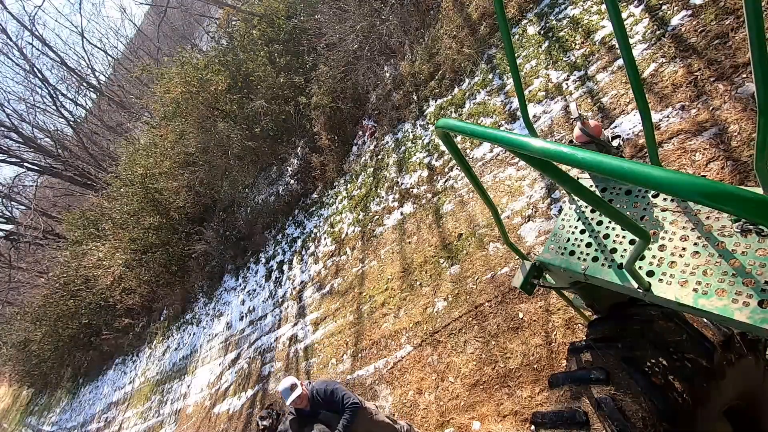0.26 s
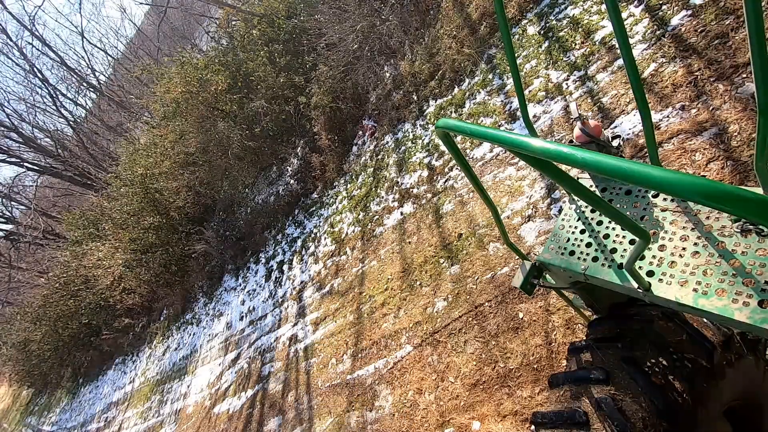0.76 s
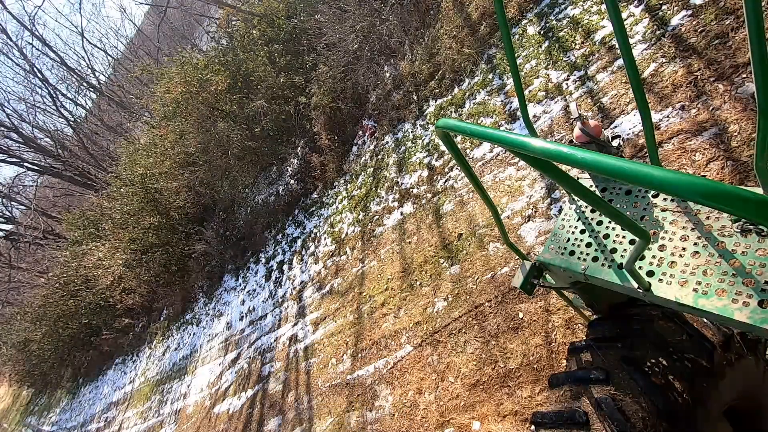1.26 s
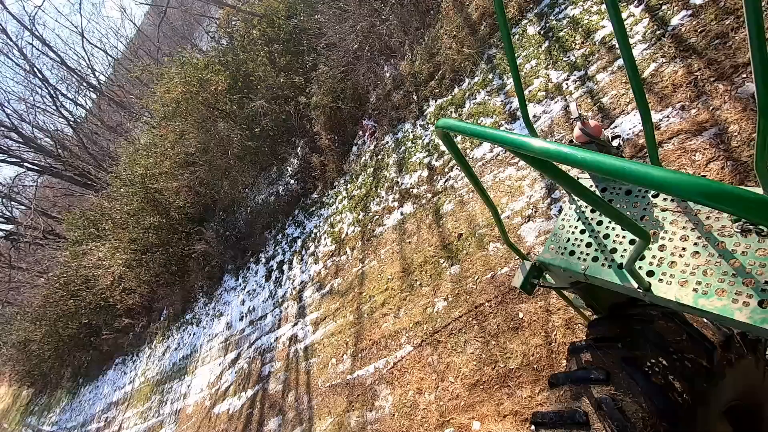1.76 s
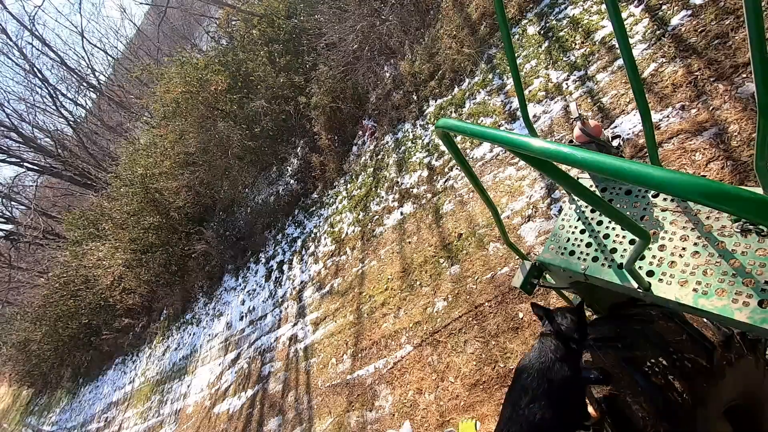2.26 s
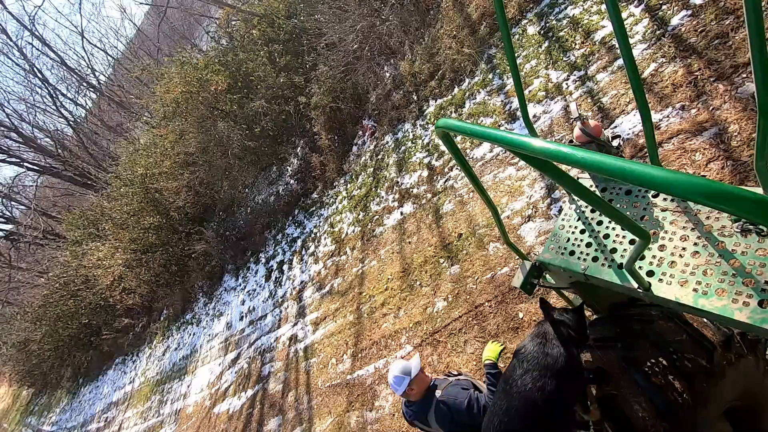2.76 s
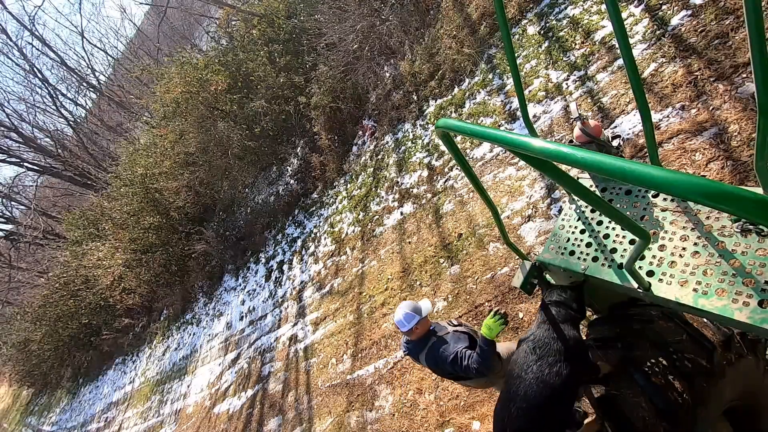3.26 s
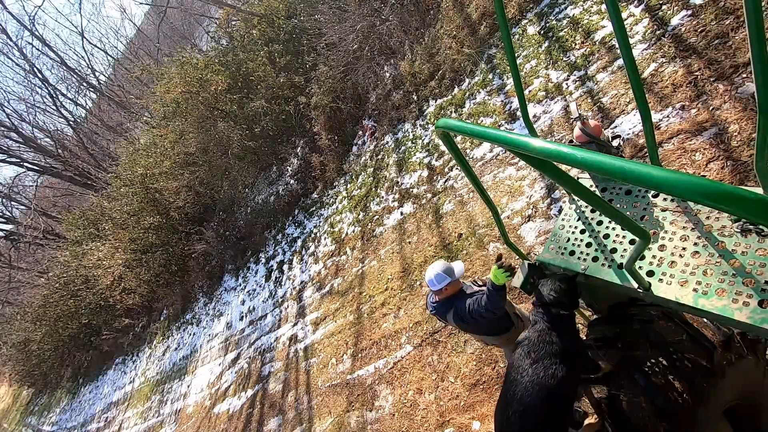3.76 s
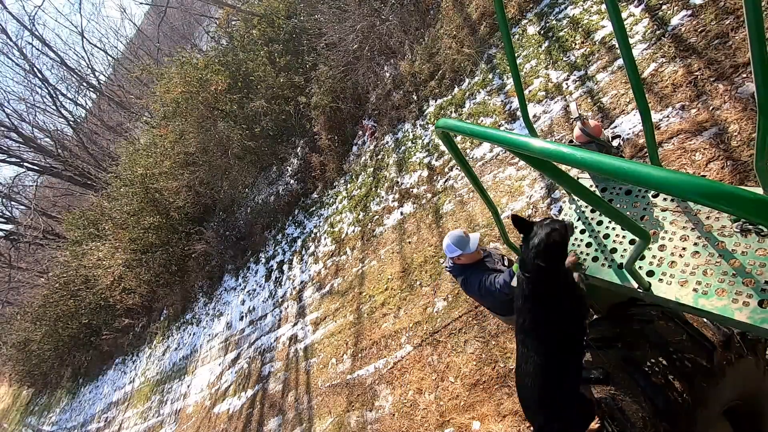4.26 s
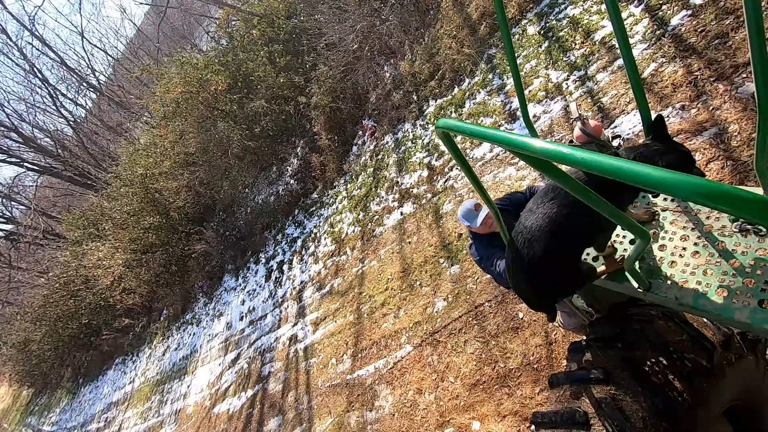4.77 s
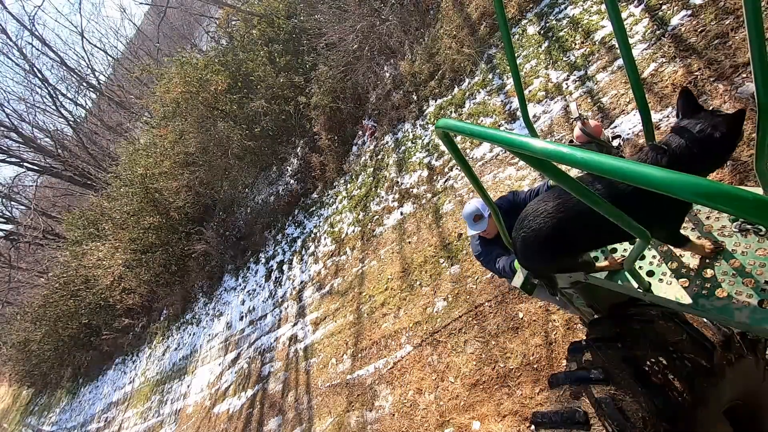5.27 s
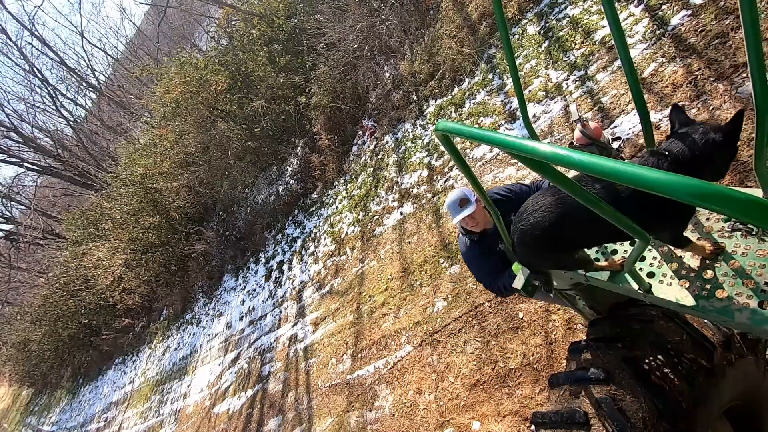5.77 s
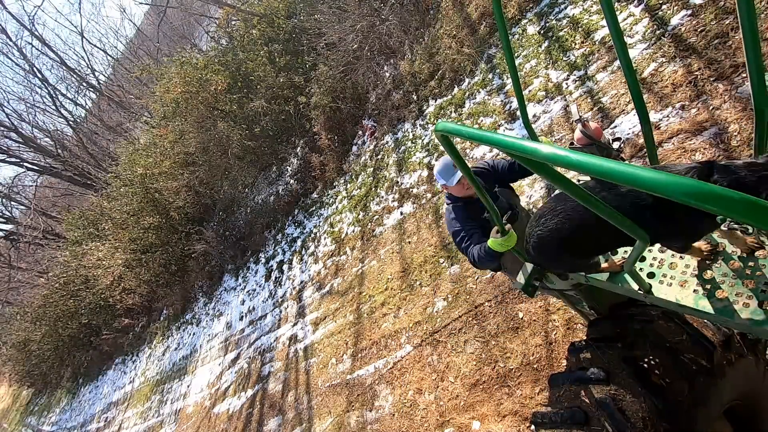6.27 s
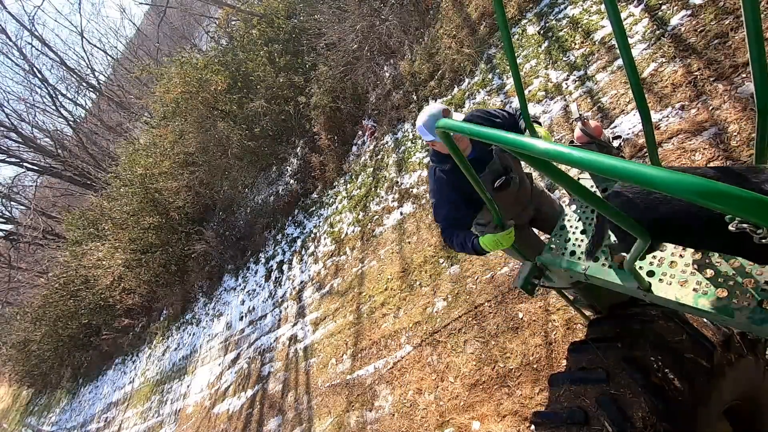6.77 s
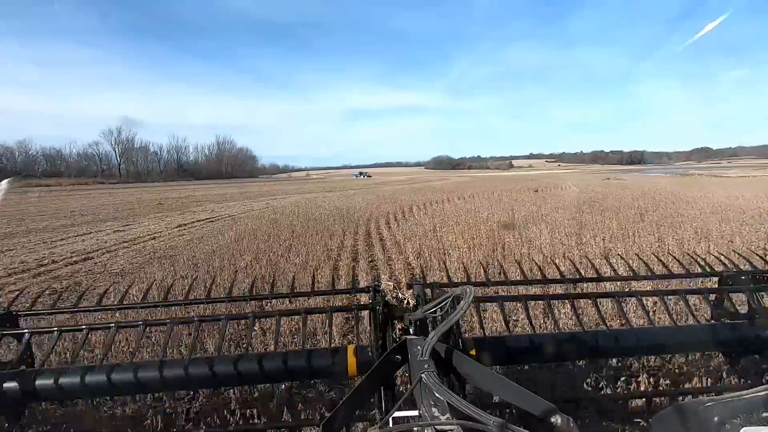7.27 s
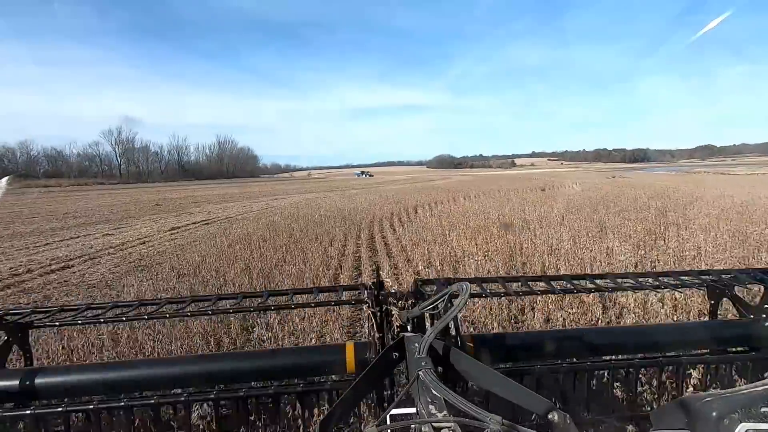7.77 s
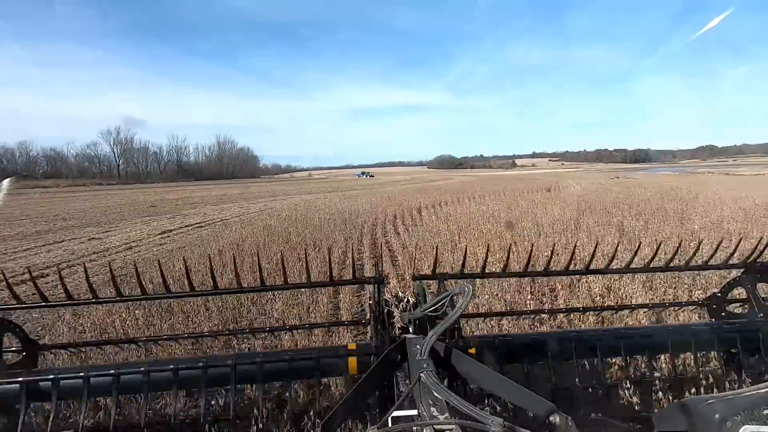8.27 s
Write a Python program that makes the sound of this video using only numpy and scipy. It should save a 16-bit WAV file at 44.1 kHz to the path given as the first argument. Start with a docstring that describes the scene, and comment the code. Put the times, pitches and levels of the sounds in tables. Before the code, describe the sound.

A microphone fixed on the harvester hears its steady idle for most of the time, with knocking, rushing air and a thin whistle. Faint gritty ticks on metal treads and a tiny shrill squeak appear late. Without any fade, the sound jumps to the enclosed cab at full working speed, bass-heavy and loud, pulsing about three times a second, with whining drives, a growing rumble and rustling, clattering crop cutting.

```python
"""A combine harvester's diesel idles, heard from the platform: hum, repeating knock, airy rush and a thin whistle.
Over it a dog is lifted up the steel ladder: noise bursts make the scuffs, and stacked tones one short squeak.
Then, abruptly, the machine is heard from inside the cab, cutting a dry crop at full speed:
throbbing tones boom, gear tones whine and sag with the shaft speed, and shaped noise makes the roar,
the header's clatter and the crackling stalks."""
import sys
import numpy as np
from scipy import signal
from scipy.fft import rfft, irfft, next_fast_len
from scipy.io import wavfile
from scipy.ndimage import uniform_filter1d, map_coordinates

SR = 44100
rng = np.random.default_rng(int(sys.argv[2]) if len(sys.argv) > 2 else 0)


def unload_wav(signal):
    """Save mono or channel-first audio to the path in sys.argv[1] as 16-bit WAV at rate SR, clipped to [-1, 1]."""
    wavfile.write(
        sys.argv[1],
        SR,
        np.round(np.clip(np.atleast_2d(signal).T, -1, 1) * 32767).astype(np.int16),
    )


N = 375291
T = np.arange(N) / SR  # time of every sample, s

# Scuffs of paws and boots on the ladder:
# (start [s], level before the stroke's shape [dB], rise [s], decay [s], low cut [Hz])
SCUFFS = [(4.455, -52, .01, .03, 2300), (4.914, -47, .016, .017, 5500), (4.993, -42, .008, .013, 2000),
          (5.659, -47, .004, 0.011, 5500), (6.394, -57, .004, .006, 5500), (6.447, -40, .004, .006, 5800),
          (6.492, -33.8, .0007, 0.007, 5200), (6.526, -50, .003, .02, 6000), (6.544, -42, .003, .007, 5000)]
# Coat and fur rubbing along the rails: (peak time [s], peak level [dB], rise [dB/s], fall [dB/s])
RUBS = [(5.15, -64.5, 28, 10), (6.5, -60, 65, 36)]
# What the steel treads ring with: (frequency [Hz], width [Hz], relative level [dB])
TREAD_RINGS = [(3900, 2400, 13.5), (6200, 740, 11), (8800, 3000, -6), (11500, 1200, -7), (14000, 2000, -9)]
# Overtones of the squeak at full pressure: (multiple of its pitch [-], level against the lowest tone [dB])
SQUEAK_OVERTONES = [(2, -5), (3, -3), (4, 2), (5, -19), (6, -22)]

# Idle hum; 3 is half the firing rate, 6 the firing rate:
# (multiple of the four-stroke cycle rate [-], level [dB])
IDLE_ORDERS = [(3, -46.5), (5, -48), (6, -42.5), (7, -48.5), (8, -54), (9, -51), (10, -53.5), (12, -43),
               (13, -52), (15, -55.5), (22, -58), (45, -62.5), (144, -67), (192, -73), (200, -72.5),
               (216, -76), (236, -77), (246, -69), (278, -72.5), (340, -79)]
# Fan and belt-driven shafts at idle: (frequency [Hz], level [dB])
IDLE_SHAFTS = [(17.7, -66), (52.7, -58), (106.2, -43.2), (151.2, -55), (212.3, -59), (354.2, -57),
               (383.6, -57.5), (767.6, -60.5)]
# Spectrum of the exhaust and fan rush at idle: (frequency [Hz], relative level [dB])
RUSH_SPECTRUM = [(20, -24), (35, -10), (47, -9), (100, 1.5), (140, -7), (185, -7), (245, -14.5), (380, -13),
                 (490, -19), (620, -17), (750, -22), (1700, -31.5), (4000, -39.5), (5700, -42.5),
                 (7300, -43), (10000, -50), (15500, -59.5)]
# Spectrum of combustion knock and valve clatter through the block: (frequency [Hz], relative level [dB])
KNOCK_SPECTRUM = [(150, -32), (300, 0.5), (600, -1.5), (820, -5.5), (1080, 0), (1750, -10), (2000, -5),
                  (2750, -13), (3000, -30), (3800, -20.5), (6000, -23.5), (12000, -50)]
# Sheet metal round the platform: (frequency [Hz], width [Hz], level against the direct sound [dB])
PLATFORM_PANELS = [(223.7, 11, -4), (293, 34, -6), (422, 25, -7.5), (543.5, 24, -3), (658, 31, -0.5),
                   (960, 96, -3.5), (1217, 23, -5.5), (1500, 74, -4), (3385, 54, -3.5), (3830, 65, -9.5),
                   (6830, 220, -16), (10550, 300, -15)]

# Gear speed at work, sagging as the crop loads the drives: (time [s], tooth mesh rate [Hz])
MESH_SPEED = [(6.9, 481.8), (7.08, 481.0), (7.26, 479.4), (7.5, 485.5), (7.72, 481.0), (7.92, 477.2),
              (8.12, 468.2), (8.51, 457.3)]
# Gear whine away from any resonance: (multiple of the mesh rate [-], level [dB])
MESH_ORDERS = [(1, -38.5), (2, -53.5), (3, -59.5), (4, -57), (5, -51), (6, -59)]
# Housing resonances that the whines slide in and out of: (frequency [Hz], width [Hz], boost [dB])
HOUSING = [(958, 24, 11), (1424.5, 37, 18), (2100, 54, 11.5), (2330, 40, 4)]
# Threshing drum and shakers: (frequency [Hz], level against the boom [dB])
DRUM = [(24.8, -6.5), (41.8, -6.5), (50.8, 0)]
# Fans and shafts at working speed: (frequency [Hz], level [dB])
WORK_SHAFTS = [(9.8, -41), (195.2, -38.5), (208, -44), (225, -44.5), (377, -42), (429, -41), (499, -48),
               (2496, -58), (5965, -67)]
# Spectrum of the machinery roar inside the cab: (frequency [Hz], relative level [dB])
ROAR_SPECTRUM = [(12, -7), (28, 3), (60, 0.5), (85, -1), (170, -7), (260, -13), (350, -14), (470, -11.5),
                 (570, -16.5), (680, -15.5), (900, -20), (1650, -26), (3000, -34), (6000, -59.5)]
# Spectrum of sickle and auger clatter in the header's sheet metal: (frequency [Hz], relative level [dB])
CLATTER_SPECTRUM = [(1200, -22), (1700, -6), (1950, 3), (2250, 1.5), (2480, -1.5), (2620, -13),
                    (3400, -12.5), (4500, -49.5)]
# Spectrum of dry stalks and pods: (frequency [Hz], relative level [dB])
CROP_SPECTRUM = [(1500, -15), (3200, 0), (4200, -1), (5200, -1), (6000, 0), (7400, -1), (9000, -5.5),
                 (11500, -10.8), (13500, -16.5), (15500, -24)]
# The cab's glass and panels: (frequency [Hz], width [Hz], level against the direct sound [dB])
CAB_PANELS = [(150, 15, -9), (307, 14, 0), (426.6, 25, 6), (480, 25, -3), (528, 21, -2), (712, 24, -3.5),
              (842, 23, -10), (1130, 70, -6), (1290, 35, -7)]
# Rings of the feeder housing: (frequency [Hz], width [Hz], relative level [dB])
FEEDER = [(160, 56, 0), (223, 44, -2), (307, 30, -3)]

CAB_FROM_S = 6.897

SQUEAK_S, SQUEAK_LENGTH_S, SQUEAK_EDGE_S = 6.297, 0.042, 0.007
SQUEAK_HZ, SQUEAK_DB = 1765, -46  # of its lowest tone
# Moment and spread of the hardest pressure; far from it each overtone loses this much more than the last
PRESS_S, PRESS_WIDTH_S, SLACK_DB = 6.308, 0.004, -6.5

IDLE_FIRING_HZ = 59.96
KNOCK_DB, RUSH_DB = -52.5, -37.5  # before the panels ring
# The whistle sinks slowly in pitch; it is strong at first, steps down, then fades
WHISTLE_START_HZ, WHISTLE_SAG_HZ_PER_S = 5282, 2.7
WHISTLE_DB, WHISTLE_FADE_DB_PER_S = -63.3, 0.65
WHISTLE_STEP_S, WHISTLE_STEP_LENGTH_S, WHISTLE_STEP_DB = 1.1, 0.27, 4.1

PUMP_RATIO, PUMP_DB = 4.336, -56  # multiple of the mesh rate; level away from any resonance
WORK_FIRING_HZ, SICKLE_HZ = 112.3, 19.3
ROAR_DB, CLATTER_DB, CROP_DB = -26.5, -41.5, -48  # roar: before the cab's panels ring
# The drum's boom throbs about three times a second; CREST is the time of one peak
BOOM_DB, BOOM_SWING_DB, BOOM_PERIOD_S, BOOM_CREST_S = -27, 4.2, 0.338, 7.612
# The load comes in slower waves; the engine's hum follows it fully, the boom in part
LOAD_SWING_DB, LOAD_PERIOD_S, LOAD_CREST_S = 4.3, 0.86, 7.52
HUM_DB, BOOM_LOAD_SHARE = -30.3, 0.3
FEED_START_DB, FEED_RISE_DB_PER_S = -46, 10

TOP_HZ = 15700


def undb(db):
    """Turn decibels into gain."""
    return 10 ** (np.asarray(db) / 20)


def unit(x):
    """Scale a signal so that its spread (standard deviation) is 1."""
    return x / np.std(x)


def noise():
    """Plain white noise: every frequency equally strong."""
    return rng.standard_normal(N)


def colour(x, spectrum):
    """Filter x through (frequency [Hz], level [dB]) points, joined by lines over log frequency; spread 1."""
    hz, db = np.transpose(spectrum)
    size = next_fast_len(N)
    f = np.maximum(np.fft.rfftfreq(size, 1 / SR), 1)
    gain = undb(np.interp(np.log(f), np.log(hz), db))
    low_cut = np.minimum(f / hz[0], 1) ** 2  # fade out below the first point
    return unit(irfft(rfft(x, size) * gain * low_cut, size)[:N])


def resonate(x, modes):
    """Let x ring a set of (frequency [Hz], width [Hz], level [dB]) resonances."""
    return sum(undb(db) * signal.lfilter(*signal.iirpeak(hz, hz / width, fs=SR), x) for hz, width, db in modes)


def walk(rate):
    """Smooth random drift that changes about rate times a second; spread 1."""
    k = int(SR / rate)
    held = np.repeat(rng.standard_normal(N // k + 2), k)
    smooth = uniform_filter1d(uniform_filter1d(held, k), k)
    return unit(smooth[:N])


def turns(hz):
    """Count the revolutions made so far at a given speed."""
    return np.cumsum(hz * np.ones(N)) / SR


def tone(phase):
    """A sine of rms 1 that follows a count of revolutions, from a random starting angle."""
    return np.sqrt(2) * np.sin(2 * np.pi * (phase + rng.random()))


def throb(swing_db, period_s, crest_s):
    """A level in dB that swells and sinks evenly."""
    return swing_db * np.cos(2 * np.pi * (T - crest_s) / period_s)


def ladder():
    """Gritty scuffs ring the steel treads; coat and fur rub along the rails."""
    grit = noise() * undb(1.6 * walk(1500))
    ring = unit(resonate(grit, TREAD_RINGS))
    rubbing = sum(undb(db - np.maximum(rise * (s - T), fall * (T - s))) for s, db, rise, fall in RUBS)
    out = rubbing * undb(2.5 * walk(25)) * ring
    for s, db, rise_s, decay_s, low_hz in SCUFFS:
        age = np.maximum(T - s, 0)
        stroke = (1 - np.exp(-age / rise_s)) * np.exp(-age / decay_s)
        scrape = signal.lfilter(*signal.butter(2, low_hz, "high", fs=SR), ring)
        out = out + undb(db) * stroke * scrape
    return out


def squeak():
    """Something slips on the ladder with a short squeak, shrill where it is pressed hardest."""
    age = T - SQUEAK_S
    sounding = np.clip(np.minimum(age, SQUEAK_LENGTH_S - age) / SQUEAK_EDGE_S, 0, 1)
    pressure = np.exp(-((T - PRESS_S) / PRESS_WIDTH_S) ** 2 / 2)
    phase = turns(SQUEAK_HZ * (1 + 0.009 * walk(400)))
    tilt_db = SLACK_DB * (1 - pressure)
    overtones = sum(undb(db + (k - 1) * tilt_db) * tone(k * phase) for k, db in SQUEAK_OVERTONES)
    return sounding * undb(SQUEAK_DB) * (tone(phase) + overtones)


def shafts(table, slip, flutter_db):
    """Each turning shaft hums on its own; slip lets its speed drift a little."""
    hum = 0
    for hz, db in table:
        level = undb(db + flutter_db * walk(12))
        hum = hum + level * tone(turns(hz * (1 + slip * walk(5))))
    return hum


def whistle(cycle):
    """The turbocharger sings faintly and flutters; each exhaust pulse shakes its pitch."""
    hz = WHISTLE_START_HZ - WHISTLE_SAG_HZ_PER_S * T
    early = 1 - np.clip((T - WHISTLE_STEP_S) / WHISTLE_STEP_LENGTH_S, 0, 1)  # 1 before the step, 0 after
    db = WHISTLE_DB - WHISTLE_FADE_DB_PER_S * T + WHISTLE_STEP_DB * early
    shaken_hz = hz + 40 * np.sin(2 * np.pi * 6 * cycle) + 7 * walk(120)
    flutter_db = 1.9 * walk(90) + (2.3 - early) * walk(26)
    return undb(db + flutter_db) * tone(turns(shaken_hz))


def idle():
    """Six firings a cycle: hum, knock that comes back alike every cycle, and rush that never repeats."""
    cycle = turns(IDLE_FIRING_HZ / 6 * (1 + 0.0002 * walk(2)))
    firing = unit(np.exp(-(6 * cycle % 1) / 0.32))  # jumps up at each firing, then dies away
    firing = firing - firing.mean()
    hum = sum(undb(db + 1.35 * walk(9)) * tone(k * cycle) for k, db in IDLE_ORDERS)
    # every injector and valve has its own rattle, at its own crank angle: one noise loop per cycle
    size = int(6 * SR / IDLE_FIRING_HZ)
    one_cycle = rng.standard_normal(size)
    rattle = map_coordinates(one_cycle, [cycle % 1 * size], order=3, mode="grid-wrap")
    knock = colour(rattle * (1 + 0.16 * firing) * undb(1.3 * walk(60)), KNOCK_SPECTRUM)
    rush = colour(noise() * (1 + 0.061 * firing) * undb(0.2 * walk(14)), RUSH_SPECTRUM)
    direct = undb(KNOCK_DB) * knock + undb(RUSH_DB) * rush
    return hum + direct + resonate(direct, PLATFORM_PANELS) + whistle(cycle)


def whine(hz, db):
    """A fluttering tone that flares up whenever its pitch meets a resonance of the housing."""
    boost_db = sum(peak_db / (1 + (2 * (hz - centre) / width) ** 2) for centre, width, peak_db in HOUSING)
    return undb(db + boost_db + 2.0 * walk(16)) * tone(turns(hz))


def drives():
    """Gears and hydraulic pump whine together and sag as crop feeds in, all tied to one mesh rate."""
    mesh_hz = np.interp(T, *np.transpose(MESH_SPEED)) * (1 + 0.0019 * walk(50))
    gears = sum(whine(k * mesh_hz, db) for k, db in MESH_ORDERS)
    return gears + whine(PUMP_RATIO * mesh_hz, PUMP_DB)


def harvest():
    """Drum and engine throb in the cab; sickle strokes chop dry stalks; the feeder rumbles as it fills."""
    load_db = throb(LOAD_SWING_DB, LOAD_PERIOD_S, LOAD_CREST_S)
    boom_db = BOOM_DB + throb(BOOM_SWING_DB, BOOM_PERIOD_S, BOOM_CREST_S) + BOOM_LOAD_SHARE * load_db
    hum_db = HUM_DB + load_db + 2.0 * walk(16)
    drum = undb(boom_db) * shafts(DRUM, slip=0.01215, flutter_db=1.0)
    engine = undb(hum_db) * tone(turns(WORK_FIRING_HZ * (1 + 0.0037 * walk(8))))
    machinery = drum + engine + shafts(WORK_SHAFTS, slip=0.00302, flutter_db=2.5) + drives()

    roar = undb(ROAR_DB) * colour(noise() * undb(0.76 * walk(20)), ROAR_SPECTRUM)
    cab_roar = roar + resonate(roar, CAB_PANELS)
    feed_db = FEED_START_DB + FEED_RISE_DB_PER_S * (T - CAB_FROM_S)
    rumble = undb(feed_db) * unit(resonate(roar * walk(40), FEEDER))

    stroke = 1 + 0.045 * tone(turns(SICKLE_HZ))
    clatter = colour(noise() * stroke * undb(1.5 * walk(200)), CLATTER_SPECTRUM)
    snaps = noise() * undb(1.1 * walk(1500))
    crop = colour(snaps * stroke, CROP_SPECTRUM)
    return machinery + rumble + cab_roar + undb(CLATTER_DB) * clatter + undb(CROP_DB) * crop


def scene():
    """First the platform at idle, then the cab at work."""
    platform = ladder() + squeak() + shafts(IDLE_SHAFTS, slip=0.00098, flutter_db=1.34) + idle()
    in_cab = np.clip((T - CAB_FROM_S) * SR / 20, 0, 1)  # crossfade over 20 samples
    mix = (1 - in_cab) * platform + in_cab * harvest()
    return mix[None]


def record(dry):
    """A steep low-pass filter removes the treble above TOP_HZ."""
    low_pass = signal.ellip(14, 0.1, 80, TOP_HZ, fs=SR, output="sos")
    return signal.sosfilt(low_pass, dry)


dry = scene()
out = record(dry)
unload_wav(out)
```